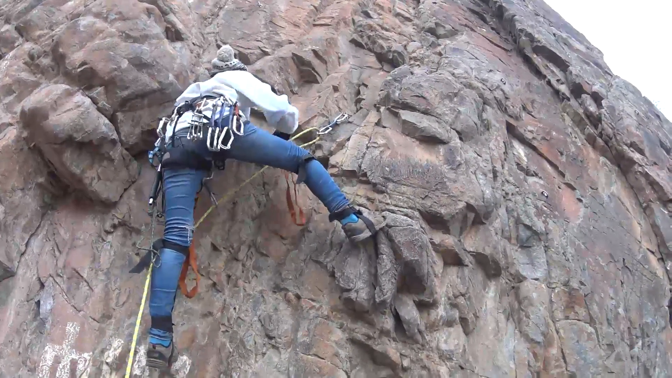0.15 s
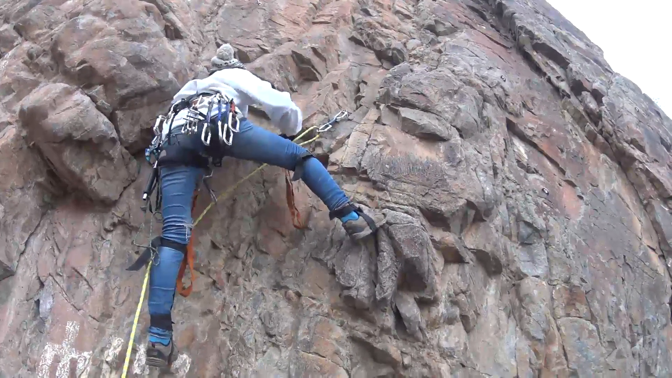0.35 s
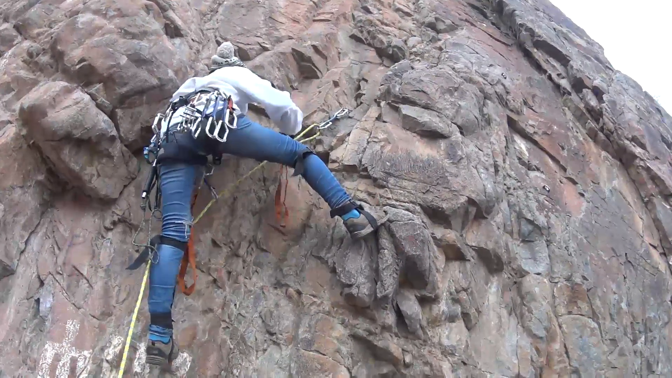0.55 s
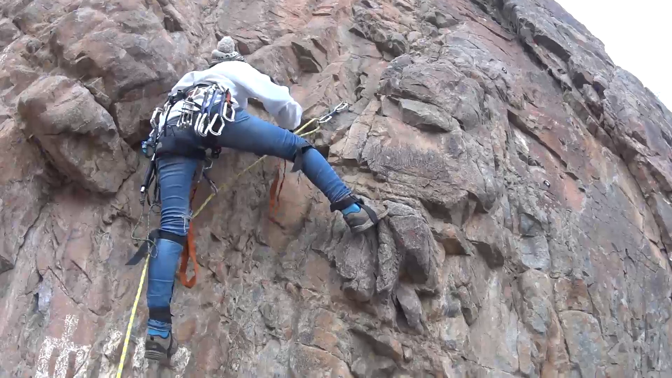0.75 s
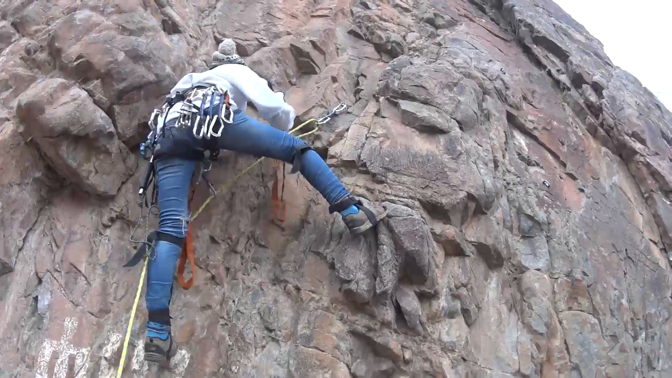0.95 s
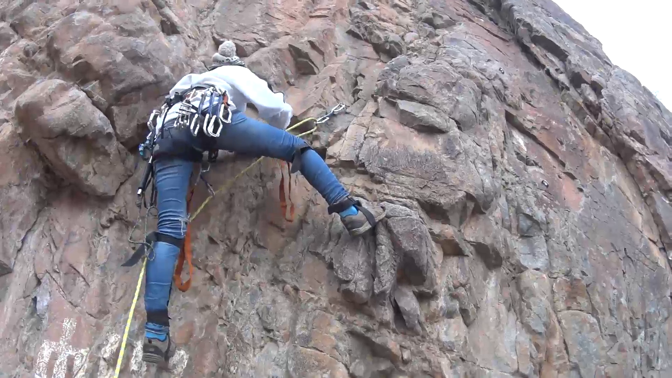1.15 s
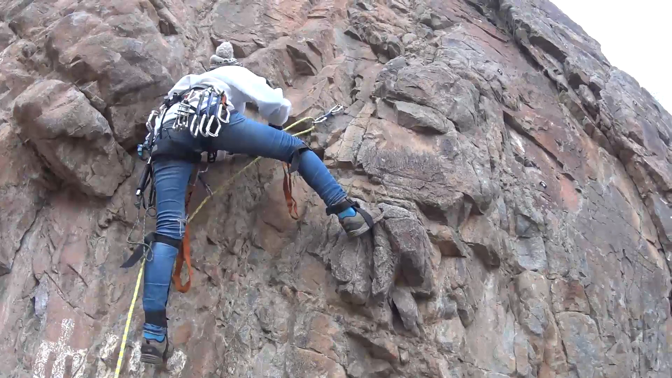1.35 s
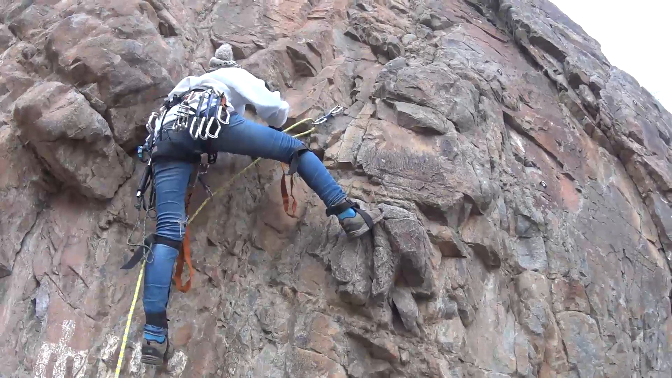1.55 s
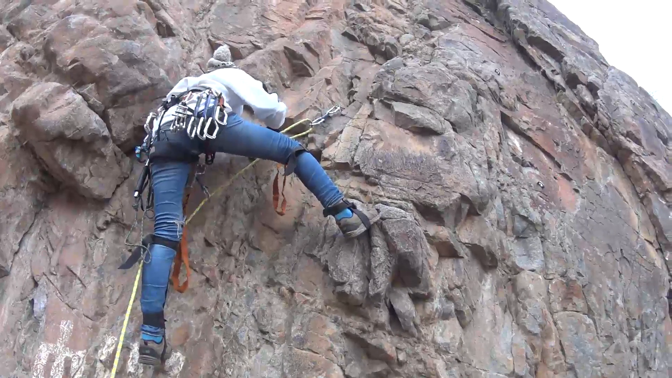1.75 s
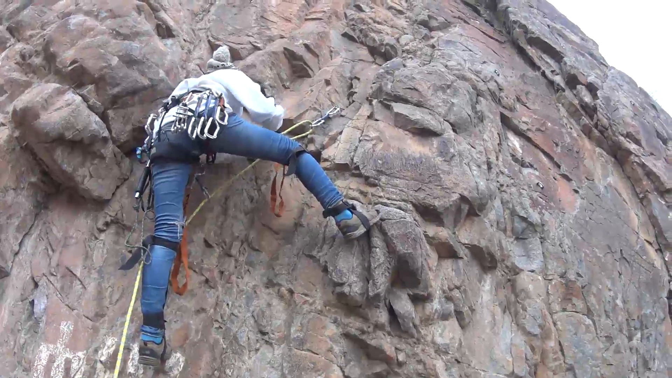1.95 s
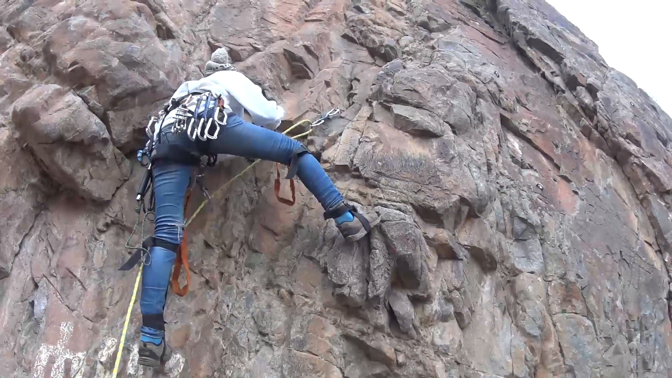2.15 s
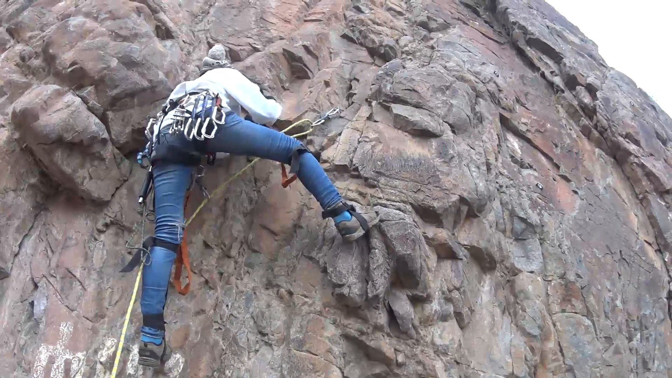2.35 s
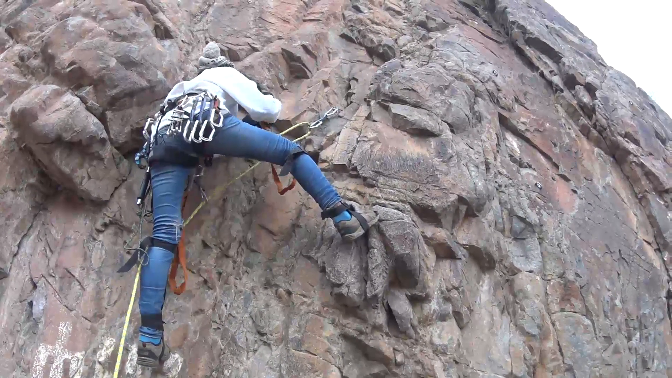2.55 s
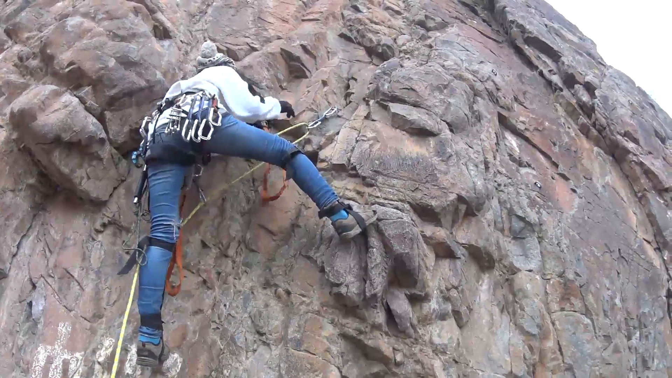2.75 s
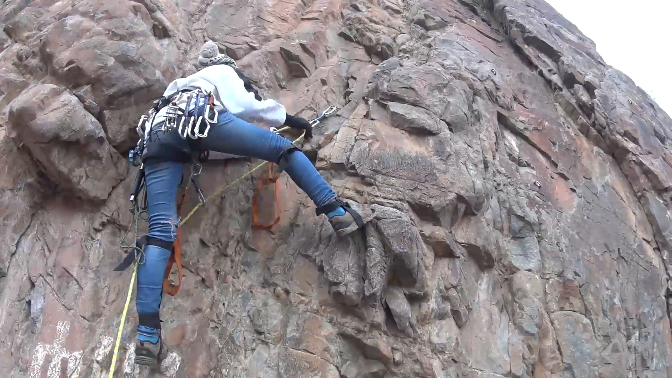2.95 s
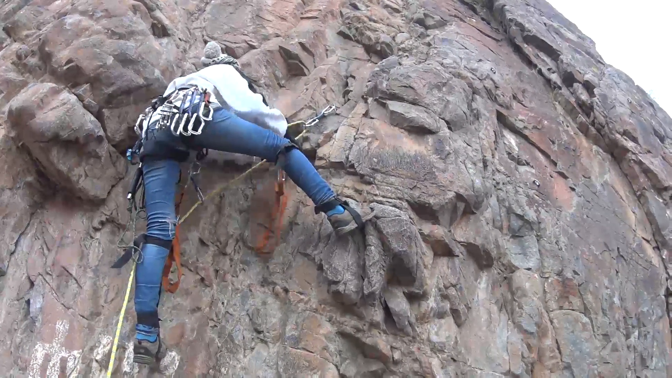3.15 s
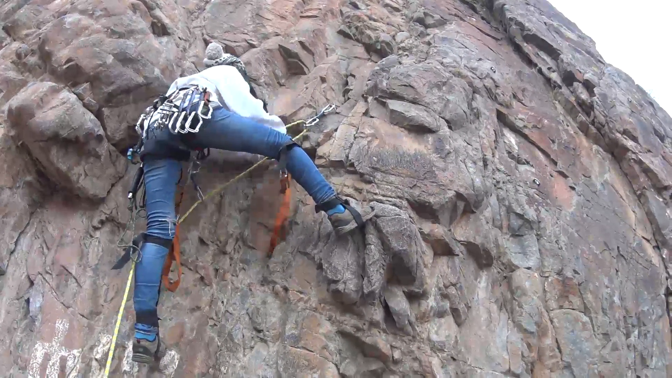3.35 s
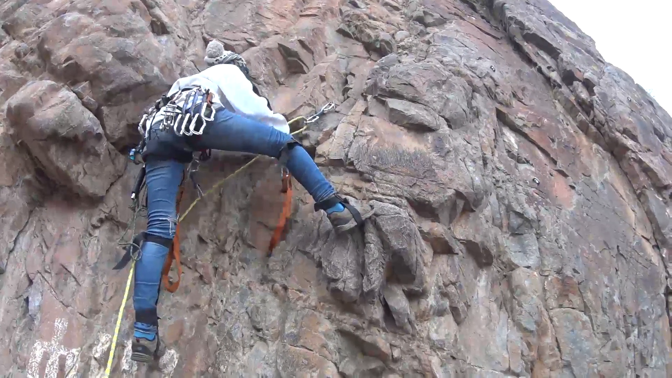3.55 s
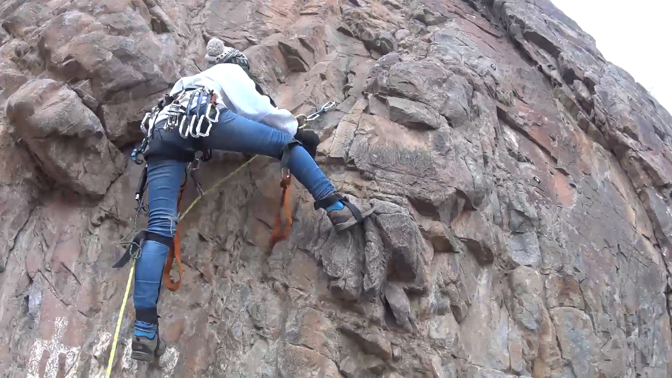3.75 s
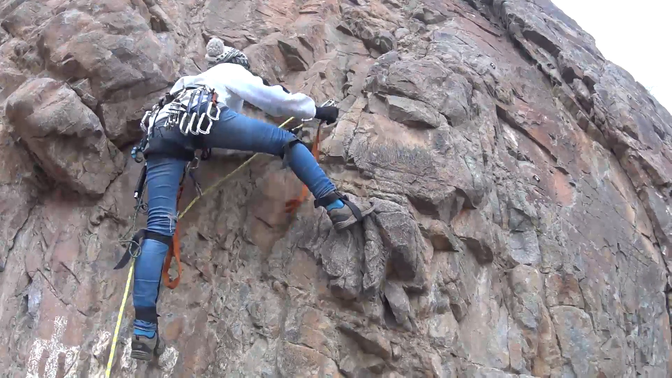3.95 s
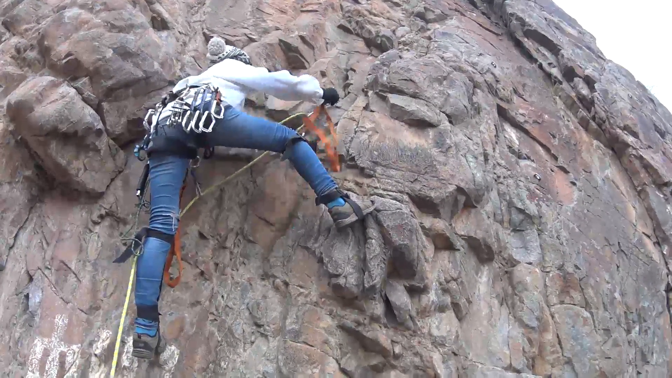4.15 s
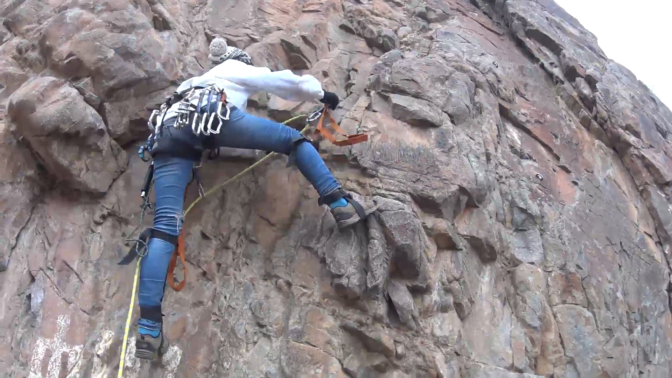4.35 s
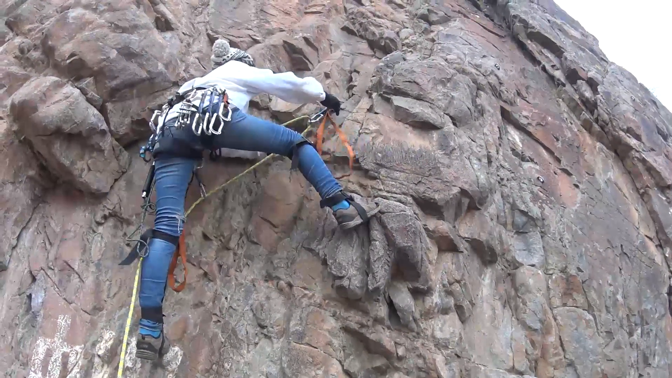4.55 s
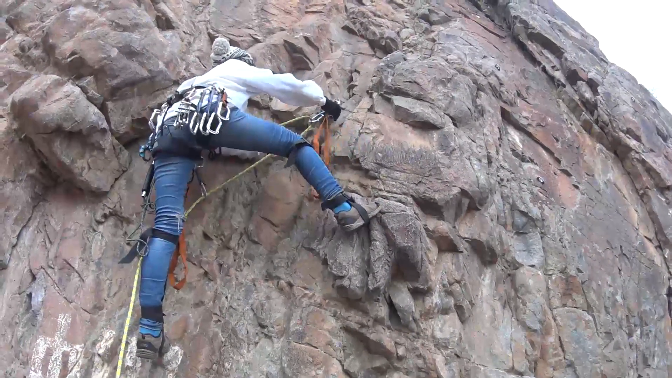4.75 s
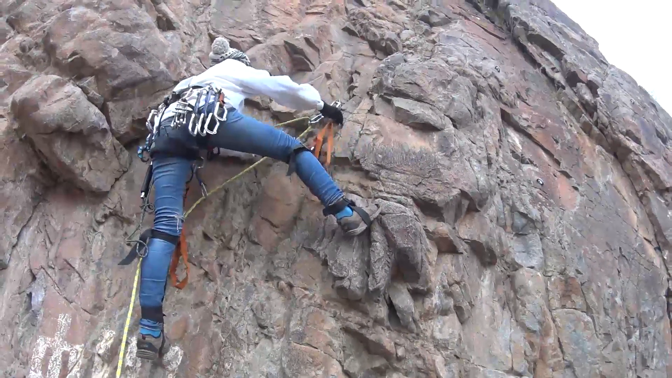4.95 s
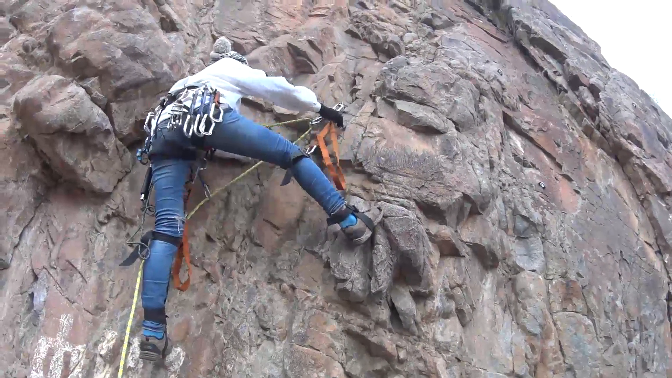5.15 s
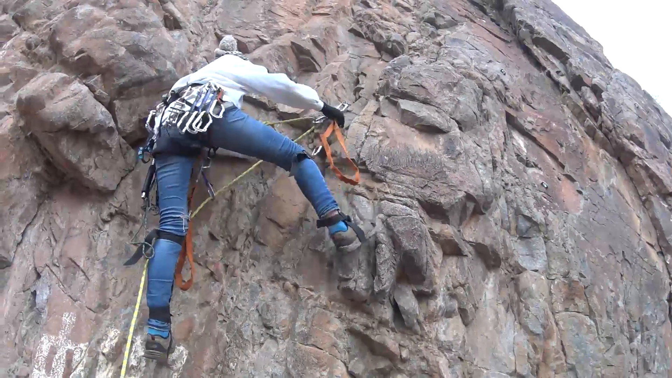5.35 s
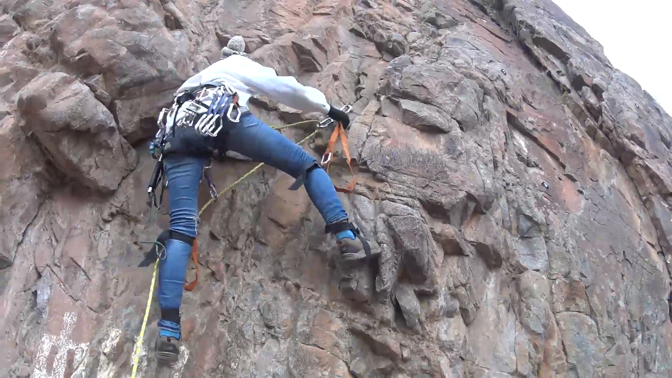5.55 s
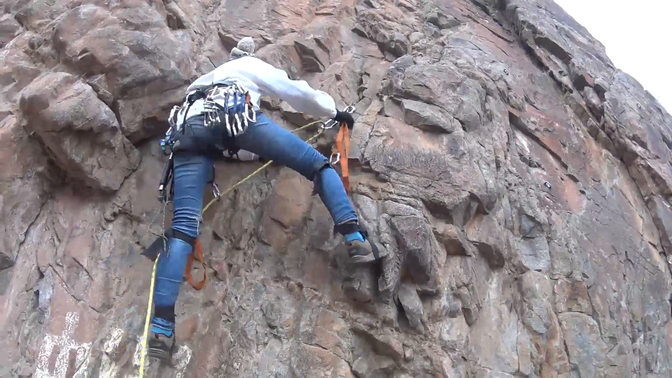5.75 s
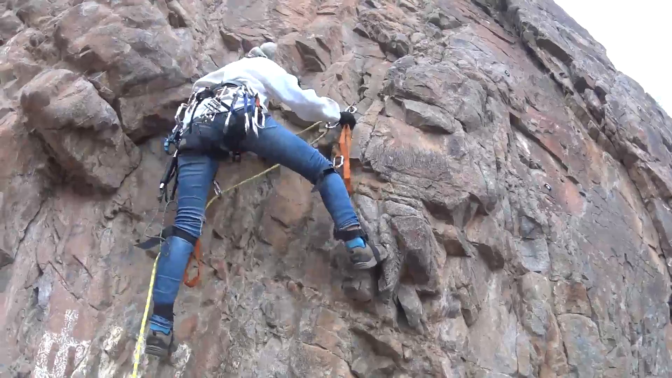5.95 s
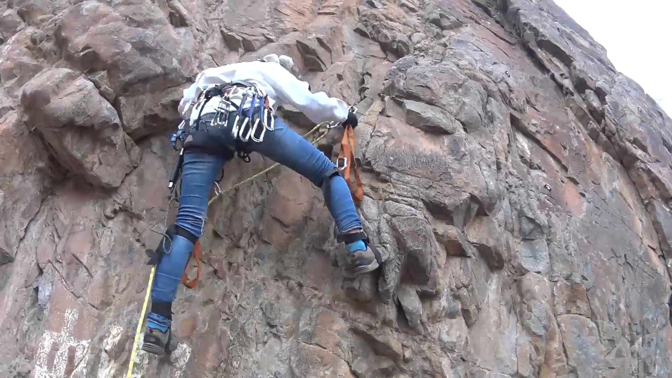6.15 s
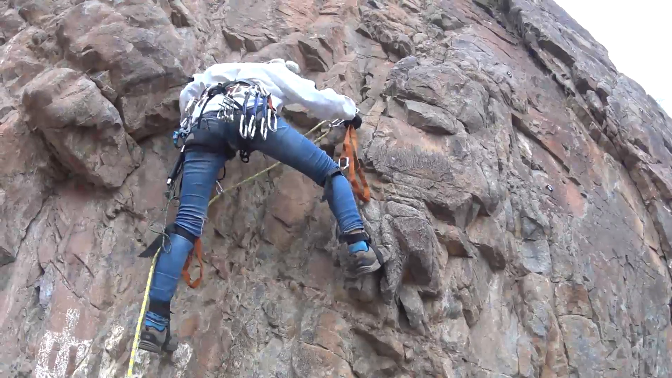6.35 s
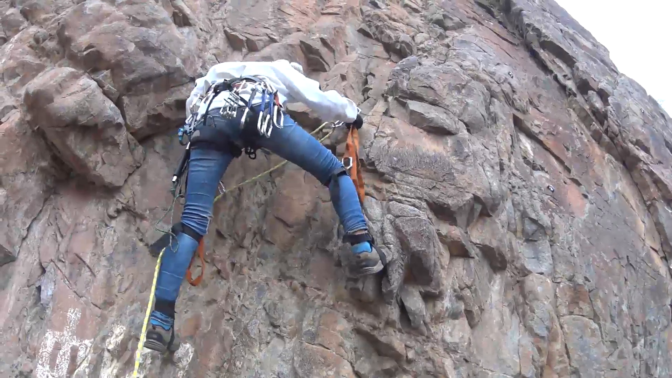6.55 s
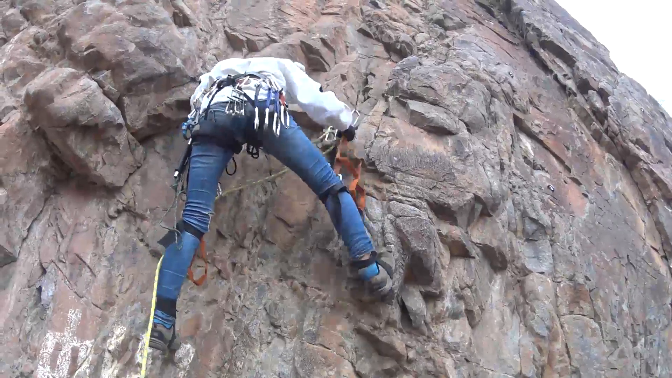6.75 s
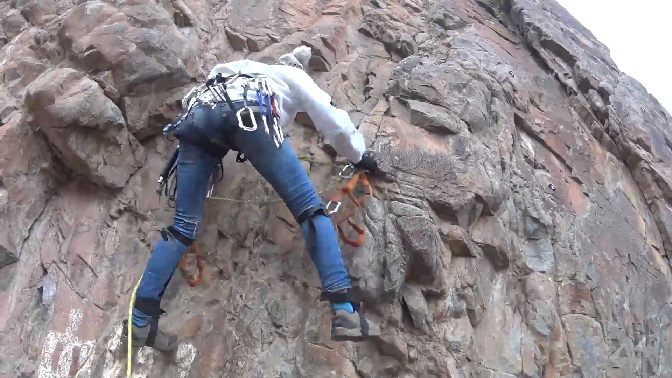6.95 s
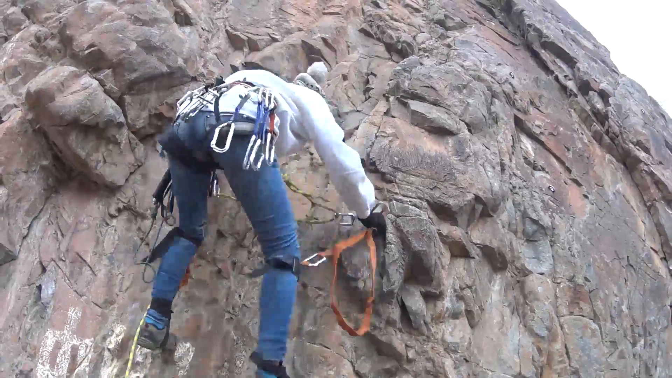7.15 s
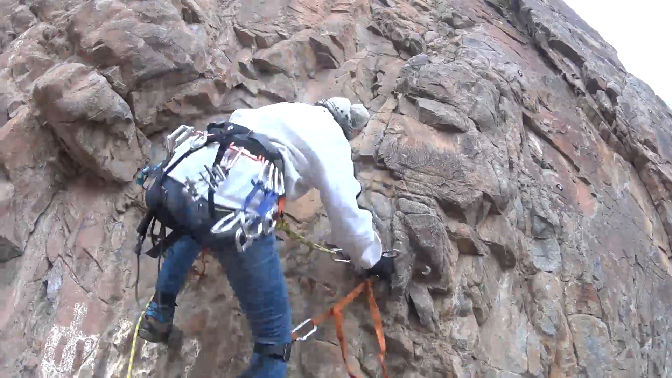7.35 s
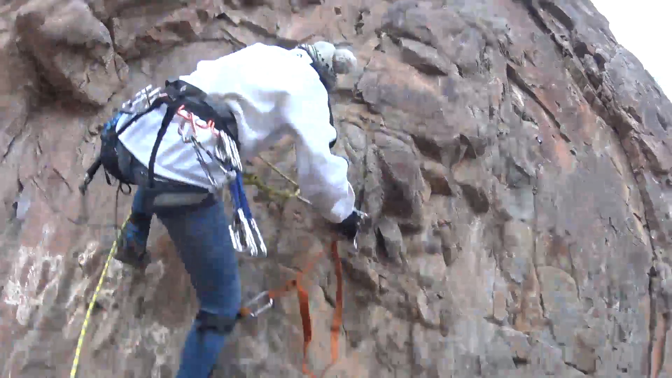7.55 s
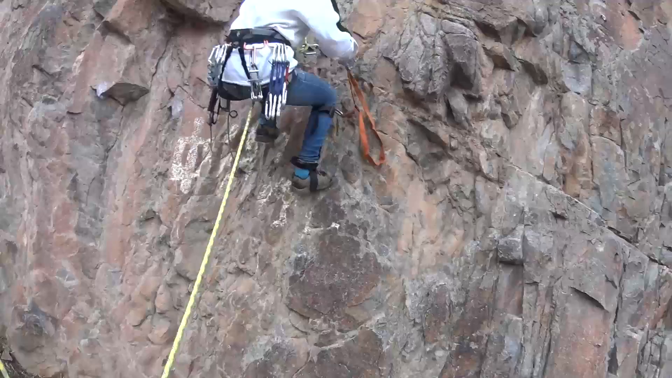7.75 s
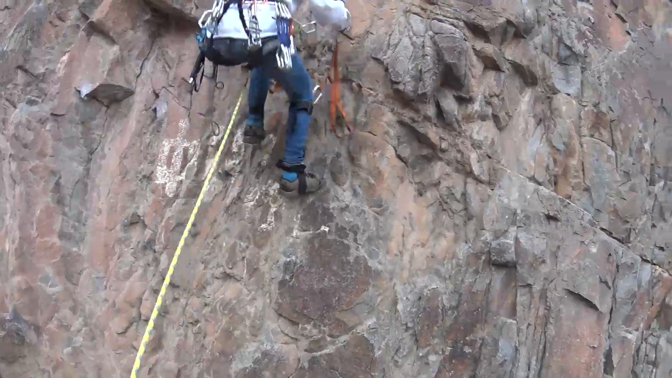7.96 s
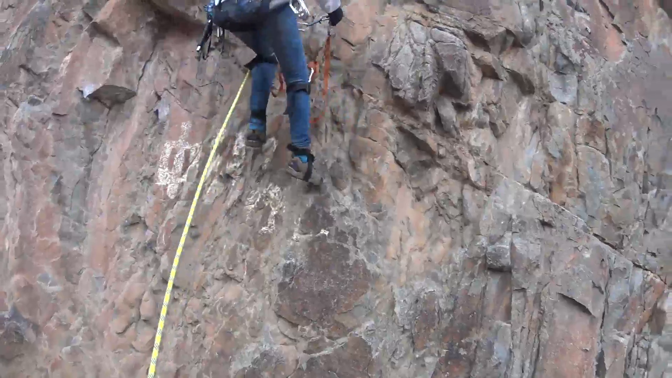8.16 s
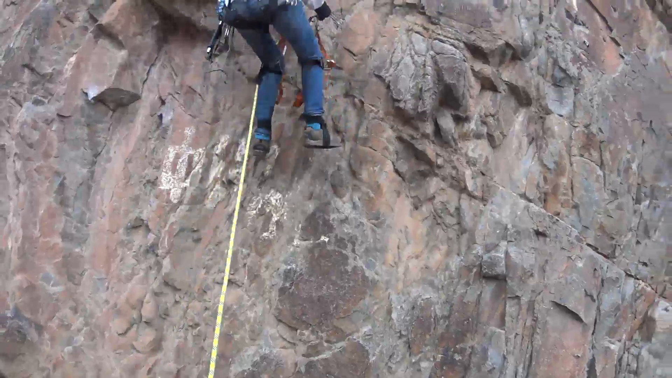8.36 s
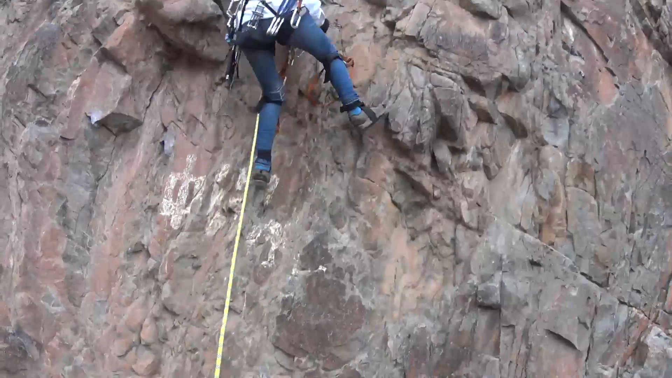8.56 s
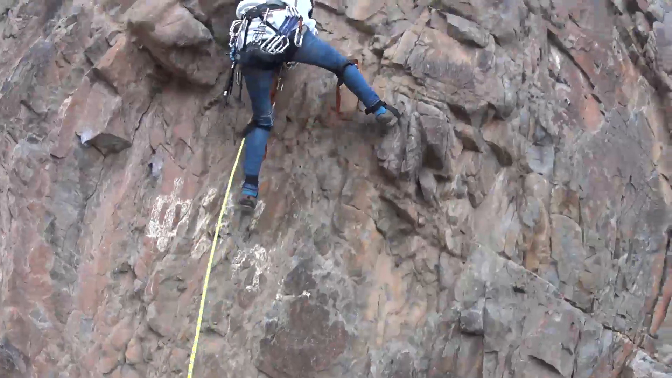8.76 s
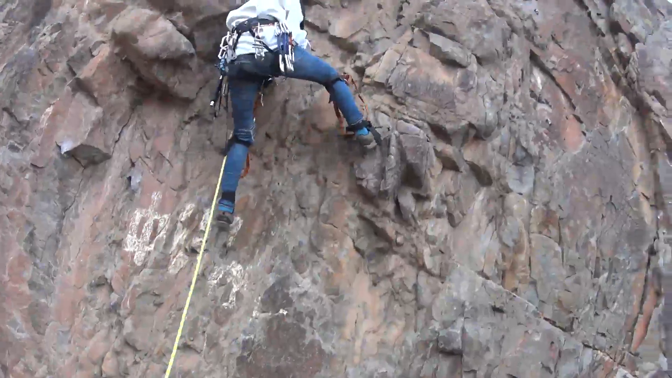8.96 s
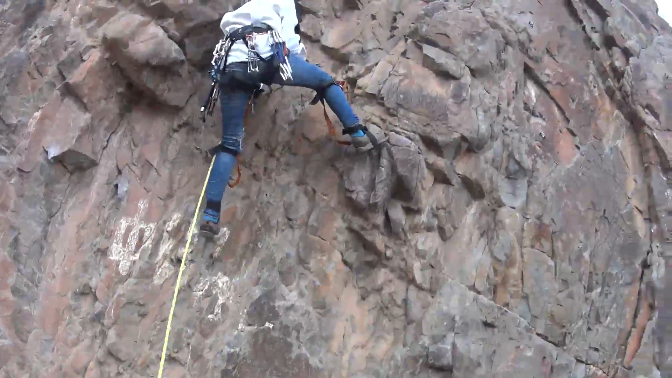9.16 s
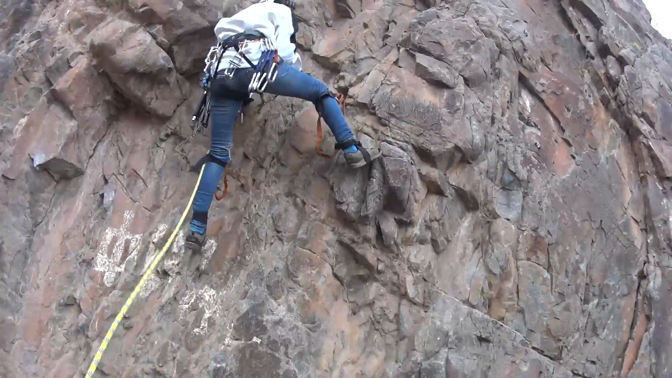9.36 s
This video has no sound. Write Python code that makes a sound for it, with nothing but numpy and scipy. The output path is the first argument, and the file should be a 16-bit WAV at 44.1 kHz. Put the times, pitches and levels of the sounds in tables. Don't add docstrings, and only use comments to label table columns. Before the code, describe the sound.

Outdoors at a rock face, a small camera a few metres away picks up a steady far wash of wind and water. Harness clips clink sparsely, pause, then clack in a small flurry. A slip throws the rack into loud, bright clattering and short rings as the rope catches. Looser jangling follows on the climb back up, with hand taps and a dull thump on the camera.

```python
import sys
import numpy as np
from scipy import signal
from scipy.fft import rfft, irfft, next_fast_len
from scipy.io import wavfile
from scipy.ndimage import uniform_filter1d

SR = 44100
rng = np.random.default_rng(int(sys.argv[2]) if len(sys.argv) > 2 else 0)


def volts_from_decibels(level):
    exponent = np.asarray(level, float) / 20
    return 10 ** exponent


def persist_wave(psi):
    counts = np.round(np.clip(psi, -1, 1) * 32767).astype(np.int16)
    wavfile.write(sys.argv[1], SR, np.atleast_2d(counts).T)


N = 414099
SCENE_CHANGE_S = 7.834


def evened(x):
    return x / np.sqrt(np.mean(x ** 2) + 1e-20)


def read(hz, value, at_hz):
    return np.interp(np.log(at_hz + 1), np.log(np.add(hz, 1)), value)


def add(mix, s, sound):
    part = mix[:, round(s * SR):][:, :sound.shape[1]]
    part += sound[:, :part.shape[1]]


def highpass(x, order, hz):
    return signal.sosfilt(signal.butter(order, hz, "high", fs=SR, output="sos"), x)


def bandpass(x, order, low_hz, high_hz):
    return signal.sosfilt(signal.butter(order, [low_hz, high_hz], "band", fs=SR, output="sos"), x)


def panned(pan_db):
    return volts_from_decibels([[pan_db / 2], [-pan_db / 2]])


# [f/Hz, level/dB per Hz]
WASH_SPECTRUM = [(30, -16), (80, -45), (125, -14.5), (250, -11.5), (750, -14.5), (1300, -7.5), (1700, 2.5),
                 (2100, 1.5), (2600, -10), (3900, -15), (4400, -12.5), (5100, -20), (6300, -28.5),
                 (7000, -29.5), (9000, -35)]
# [t/s, level change/dB]
CAMERA_TURN = [
    (8.7, -4.5),
    (8.9, -1.5),
    (9.05, -8.5),
    (9.15, -14),
    (9.39, -6.5),
]


def wash(level_db=-33.5, patchy_db=0.7, housing_hz=1600, width_hz=350):
    frames, hz = N // 256 + 5, np.fft.rfftfreq(1024, 1 / SR)
    a, b, c, d, patches = rng.standard_normal((frames, 513, 5)).T
    patches = uniform_filter1d(patches, size=12, axis=0)
    patches = evened(uniform_filter1d(patches, size=14, axis=1))
    resonance = np.exp(-((hz - housing_hz) / width_hz) ** 2)
    turn_db = np.interp(np.arange(frames) * 256 / SR, *np.transpose(CAMERA_TURN))
    db = read(*np.transpose(WASH_SPECTRUM), hz)[:, None] + patchy_db * patches
    db = db + np.outer(resonance, turn_db)
    spectra = np.array([a + 1j * b, c + 1j * d]) * volts_from_decibels(db)
    noise = signal.istft(spectra, nperseg=1024, noverlap=768)[1][:, :N]
    return volts_from_decibels(level_db) * evened(noise)


# [t/s, peak level/dB]
SNAP_TICKS = [(0.0992, -28), (0.7751, -26), (4.6369, -35), (4.7017, -35), (5.693, -24), (5.7166, -20),
              (5.8077, -16), (6.2502, -21), (6.8418, -19), (6.8633, -18), (6.9212, -24), (6.9466, -20),
              (7.0315, -8), (7.0489, -16), (7.133, -8), (7.1404, -25), (7.2873, -16), (7.296, -13),
              (7.3412, -23), (7.3871, -32), (7.5487, -11), (7.7414, -27), (7.7682, -27), (7.7817, -14),
              (8.9654, -26), (8.973, -19), (8.9844, -28)]


def snaps():
    steps = np.zeros(N)
    s, db = np.transpose(SNAP_TICKS)
    steps[np.round((s + .0009) * SR).astype(int)] = volts_from_decibels(db + 6)
    tick = highpass(steps, 2, 2500)
    return np.array([tick, np.roll(tick, 9)])


# [f/Hz, level/dB]
RACK_MODES = [(900, -86), (1650, 6), (2150, 10.5), (2900, 1), (3700, 7.5), (4500, 8.5), (5600, 6),
              (6300, -3), (7000, 8.5), (8300, -1), (9350, -2.5), (9900, 3.5), (10700, 7), (12500, 6)]
REST, MUTE = 0.11, 0.22
FRAME_HZ, DAMPING = 3680, 0.17


def clack(body_db, edge_db, t60, main_hz, count=48, scatter_db=6.0, near_db=7.0, near_hz=600):
    place, size, life, turn = rng.random((4, 2, count, 1))
    hz = 1000 + 12000 * (np.arange(count)[:, None] + place) / count
    t = np.arange(round(t60 * SR) + 300) / SR
    db = read(*np.transpose(RACK_MODES), hz) + scatter_db * (2 * size - 1)
    db = db + near_db * np.exp(-((hz - main_hz) / near_hz) ** 2)
    contact = np.minimum(t / 0.00029, 1) * (1 + 0.8 * np.exp(-t / 0.0016))
    strike = contact * (REST + np.exp(-(t / (MUTE * t60)) ** 2))
    mode_t60 = t60 * (.4 + .7 * life) * (4500 / hz) ** DAMPING
    modes = strike * volts_from_decibels(db - 60 * t / mode_t60) * np.sin(2 * np.pi * (hz * t + .45 * turn))
    main = volts_from_decibels(20.5 - 60 * t / (0.3 * t60)) * np.sin(2 * np.pi * main_hz * t)
    main += volts_from_decibels(7.5 - 60 * t / (0.98 * t60)) * np.sin(2 * np.pi * FRAME_HZ * t)
    bands = np.split(modes, [count // 6, count * 3 // 7], axis=1)
    body, blow, edge = (band.sum(1) for band in bands)
    layers = zip((body, blow + main, edge), (body_db, 0, edge_db))
    return sum(volts_from_decibels(d) * x / np.sqrt(np.mean(x[:, :220] ** 2)) for x, d in layers)


# [t/s, blow level/dB, body level/dB re blow, edge level/dB re blow, strongest mode f/Hz]
SHIFT_BLOWS = [(0.1, -37.5, -10, -4, 3740), (0.14, -45, -8, -18, 4800), (0.606, -42.5, -7, -5, 4690),
               (0.776, -35, -22, 1, 5730), (4.328, -41, -1, -11, 4310), (4.5286, -41, -4, -18, 4220),
               (4.6373, -30, -14, -11, 4740), (4.7025, -42, -5, -3, 3650), (5.5571, -28, 0, -7.5, 4600),
               (5.6504, -40, -3, -5, 4220), (5.694, -31.5, -14, -11, 4900), (5.7065, -35, -9, -7, 4690),
               (5.7184, -23, -15, -6, 3820), (5.736, -36, -9, -3, 3800), (5.7473, -38, -15, -2, 3770),
               (5.8086, -24.5, -20, 1, 4830), (6.0763, -31, -17, -8, 5640), (6.114, -35.5, -9, -0.5, 4730),
               (6.1616, -44, -3, -9, 5430), (6.251, -25.5, -10, -2, 5600)]
SLIP_BLOWS = [(6.711, -24, 1.5, -7, 4400), (6.723, -28, -3, -4, 4350), (6.8426, -21, -13, -7, 4760),
              (6.8636, -23.5, -7, -1, 4770), (6.883, -28.5, -8, -5, 3370), (6.921, -29, -10, -6, 3570),
              (6.9461, -15.5, -9, -9, 4240), (6.9537, -20, -4, -6, 4450), (6.974, -17, -27, -10, 4230),
              (7.032, -16.5, -1.5, -5, 4450), (7.05, -18.5, -32, -4, 4200), (7.1125, -28, 1, -18, 3620),
              (7.1326, -25, -23, -1, 4550), (7.1409, -22, -16, -15, 3670), (7.192, -28, -8, 2, 4870),
              (7.2137, -25.5, 4, 3, 5330), (7.219, -23.5, -5, 0, 4500)]
CATCH_BLOWS = [(7.28, -36, 2, -2, 4910), (7.2878, -25.5, -1, -5, 3530), (7.2958, -23, 1.5, 2.5, 4000),
               (7.3051, -21.5, 3.5, 0, 4400), (7.326, -28.5, 5, -3, 3430), (7.3424, -27, -2, -4, 3560),
               (7.3876, -29, -11, -10, 4890), (7.422, -38, -10, 8, 4670), (7.432, -17.5, -16, -12, 4930),
               (7.4479, -22.5, -24, -1, 5530), (7.47, -35, -11, 3, 4720), (7.5188, -29, -6, -14, 5200),
               (7.527, -26.5, -3, 0, 3660), (7.548, -29, -3, 7, 3630), (7.58, -29.5, 2, -12, 8280),
               (7.616, -36, -11, 1, 3740), (7.6805, -29, 3, -8, 4390), (7.7402, -38, 5, -9, 3700),
               (7.7687, -24, -10, -9, 4970), (7.7827, -23, -4, -3, 4900), (7.823, -39, -11, -5, 5100)]
CLIMB_BLOWS = [(8.017, -37.5, 4, -9, 3140), (8.28, -31.5, -13, -14, 4400), (8.3331, -37, -3, -4, 3670),
               (8.4256, -27.5, 0, -16, 3860), (8.484, -37, -10, -2, 5250), (8.5149, -31, -12, -8, 3550),
               (8.5354, -31, -21, 1, 5000), (8.569, -26, -14, 1, 5430), (8.6857, -26.5, -16, -6, 3630),
               (8.9658, -33, -12, 1, 5940), (8.975, -24.5, -21, 0.5, 5060), (9.027, -37.5, -10, 0.5, 3750),
               (9.1436, -33.5, -8, 0, 5700), (9.2984, -48, 0, -3, 4740), (9.33, -37.5, -9, -5, 3230)]
FURTHER_BLOWS = [(0.464, -47, -10, -5, 5700), (0.787, -50, -10, -3, 5700), (6.743, -41, -5, -5, 4500),
                 (7.486, -34, 0, -2, 5770), (7.559, -27, -6, -5, 5330), (7.565, -29, -12, -8, 5260),
                 (7.609, -33, -6, -8, 4290), (7.622, -29.5, 6, -5, 4400), (8.288, -39, -10, -13, 4500),
                 (8.436, -35, -8, -7, 4200), (8.491, -38, -10, -3, 5030), (8.541, -33, -15, -2, 4850),
                 (8.6, -33, -10, 2, 5100), (8.635, -37, -12, 2, 4930), (8.986, -35, -15, 2, 4970),
                 (9.125, -41, -8, -11, 5400), (9.149, -38, -10, -3, 5850), (5.727, -36, -10, -5, 3740),
                 (5.817, -43, -10, 3, 4300), (6.255, -50, -10, 7, 5200), (8.519, -38, -7, -1, 4500),
                 (9.2, -44, -10.5, -2, 5000), (6.835, -34, 2, -14, 3800), (7.437, -24, -11, -1, 5000),
                 (7.443, -25, -11, -1, 5600), (7.554, -26, -2, -6, 3740), (6.266, -48, -10, 6, 5160)]
BARE_ROCK_S = (5.5566, 5.6945, 5.707, 6.8425, 7.1408, 7.3876, 7.5192, 7.5274, 7.7683, 7.823, 8.4253, 8.436,
               8.6853, 8.9658, 8.975, 9.1437)


def clacks():
    out = np.zeros((2, N))
    for s, db, body_db, edge_db, hz in SHIFT_BLOWS + SLIP_BLOWS + CATCH_BLOWS + CLIMB_BLOWS + FURTHER_BLOWS:
        t60 = np.interp(db, [-45, -26], [0.14, 0.062])
        if np.isclose(s, BARE_ROCK_S, atol=.0025).any():
            t60 = 0.018
        add(out, s, volts_from_decibels(db) * clack(body_db, edge_db, t60, hz))
    return out


# [t/s, level/dB, f/Hz, t60/s]
FREE_RINGS = [(0.182, -55, 9250, .04), (0.466, -47, 5700, .07), (0.608, -49, 9330, .07),
              (0.612, -50, 5500, .05), (0.777, -34, 3650, .05), (4.6395, -32, 3690, .07),
              (4.704, -36, 3700, .04), (5.5565, -19, 4600, .018), (5.558, -36, 3620, .04),
              (5.572, -42, 5790, .045), (5.719, -44, 9300, .06), (5.719, -35, 5900, .03),
              (5.722, -32, 3700, .16), (5.81, -36, 3630, .14), (5.81, -36, 10500, .06),
              (5.905, -41, 4400, .09), (6.077, -38, 5700, .06), (6.114, -39, 9400, .05),
              (6.145, -44, 4300, .05), (6.162, -51, 8200, .04), (6.252, -36, 3670, .05),
              (6.253, -37, 10700, .05), (6.253, -38, 6830, .04), (6.711, -12, 1650, .03),
              (6.71, -19, 1300, .025), (6.925, -34, 3620, .09), (6.947, -21, 4060, .045),
              (7.033, -25, 6900, .045), (7.009, -43, 9400, .02), (6.975, -24, 4100, .03),
              (7.105, -34, 3700, .04), (7.109, -37, 4520, .054), (7.147, -37, 9330, .26),
              (7.15, -44, 7080, .045), (7.13, -43, 10150, .05), (7.156, -39, 8170, .132),
              (7.159, -38, 5430, .052), (7.165, -39, 5730, .045)]
# [t/s, level/dB, f/Hz, t60/s]
ROPE_RINGS = [(7.388, -30, 4890, .025), (7.298, -26, 4050, .04), (7.431, -29, 3600, .045),
              (7.432, -25, 4850, .04), (7.445, -28, 5500, .06), (7.52, -35, 5700, .12),
              (7.783, -26, 4950, .04), (7.455, -32, 3620, .097), (7.458, -34, 4310, .081),
              (7.488, -31, 5770, .045), (7.553, -31.5, 3720, .2), (7.554, -33, 510, .06),
              (7.556, -33, 355, .06), (7.751, -44, 7950, .05), (7.571, -45, 7080, .088),
              (7.578, -26, 2300, .03), (7.632, -40, 3450, .16), (7.638, -37, 4260, .088),
              (7.696, -42, 3820, .081), (7.745, -35, 3680, .09), (7.437, -33, 6850, .04)]
# [t/s, level/dB, f/Hz, t60/s]
ASCENT_RINGS = [(8.338, -40, 3720, .11), (8.594, -40, 3620, .15), (8.536, -42, 7600, .08),
                (8.516, -43, 10500, .05), (8.537, -31, 4820, .06), (8.62, -42, 10642, .2),
                (8.578, -44, 8170, .15), (8.633, -42, 9300, .052), (8.758, -42, 3650, .12),
                (8.976, -29, 5000, .07), (8.98, -37, 3710, .14), (9.028, -43, 10720, .07),
                (9.144, -38, 5810, .07), (9.125, -49, 8200, .2), (9.298, -46, 9350, .08),
                (9.33, -44, 5800, .05)]
# [t/s, level/dB, f/Hz, length/s]
CAUGHT_RINGS = [(6.1, -49, 9300, .05), (7.062, -29, 4405, .038), (7.18, -32, 7070, .02),
                (7.421, -32, 9330, .035), (7.468, -28, 9340, .026), (7.533, -39, 8170, .025),
                (7.575, -37, 8170, .016), (7.612, -41, 8170, .068), (7.638, -36.5, 5450, .085),
                (7.64, -44, 9350, .052), (7.684, -37, 10146, .058), (7.695, -42, 8170, .03),
                (7.808, -45, 9300, .024), (8.537, -34, 3610, .025), (8.537, -34, 9300, .016),
                (8.545, -41, 7084, .05), (8.557, -40, 9300, .035), (8.57, -34, 3620, .022),
                (8.568, -31, 5450, .016), (9.295, -50, 7100, .012), (7.464, -36, 7150, .012),
                (7.55, -33, 3720, .025), (7.122, -43, 7080, .012), (8.571, -21, 10642, .018),
                (8.59, -28, 10642, .028), (8.592, -36, 1700, .006), (7.742, -36, 3680, .012)]
# [f/Hz, left-right level/dB]
HOUSING_SHADE = [(3000, 1), (5800, 3), (7100, 4), (8150, 7), (9350, 11.5), (10600, 5)]
GATE_HZ = (7080, 10150)
QUICK_S, SLOW_S = 0.0016, 0.036
CAUGHT_T60_S, CATCH_S = .4, .005
CROWD_HZ, CROWD = 9500, 0.7


def rings(split_hz=40.6, twin=0.3, flutter_db=1.6):
    out, flutter = np.zeros((2, N)), rng.standard_normal(1500)
    rows = [(*row, np.inf) for row in FREE_RINGS + ROPE_RINGS + ASCENT_RINGS]
    rows += [(s, db, hz, CAUGHT_T60_S, length) for s, db, hz, length in CAUGHT_RINGS]
    for (s, db, hz, t60, length), (u, v, w) in zip(rows, rng.random((len(rows), 3))):
        swell = QUICK_S if length > t60 else CATCH_S
        if np.isclose(hz, GATE_HZ, rtol=.02).any() and length > t60:
            swell = SLOW_S
        t = np.arange(round(min(swell + t60, length + CATCH_S) * SR)) / SR
        shape = np.minimum(t / swell, 1) * volts_from_decibels(db + 3 - 60 * np.maximum(t - swell, 0) / t60)
        shape *= np.clip(1 - (t - length) / CATCH_S, 0, 1)
        shape *= (s > SCENE_CHANGE_S) | (s + t < SCENE_CHANGE_S)
        shape *= volts_from_decibels(flutter_db * np.interp(t + s, np.arange(len(flutter)) / 150, flutter))
        turn = 2 * np.pi * (hz * t + np.array([[0], [.7 * (u - .5)]]))
        pair = np.sin(turn) + twin * np.sin(turn + 2 * np.pi * (split_hz * (.5 + v) * t + w))
        if abs(hz - CROWD_HZ) < 150:
            below = np.sin(turn - 2 * np.pi * (95 * t + v))
            above = np.sin(turn + 2 * np.pi * (70 * t + u))
            pair += CROWD * (below + above)
            pair /= np.sqrt(1 + 2 * CROWD ** 2)
        add(out, s, shape * pair * panned(read(*np.transpose(HOUSING_SHADE), hz)))
    return out


# [t/s, level/dB]
SHAKES = [
    [(5.63, -52), (5.77, -48), (5.9, -54), (6.05, -58), (6.12, -52), (6.3, -66)],
    [(6.7, -45), (6.79, -52), (6.84, -36), (6.9, -46), (6.96, -36.5), (7.02, -42), (7.06, -36), (7.12, -45),
     (7.16, -33.5), (7.22, -36), (7.27, -46)],
    [(7.27, -50), (7.31, -37), (7.38, -44.5), (7.44, -32.5), (7.5, -34), (7.56, -34), (7.63, -35),
     (7.66, -37), (7.69, -37.5), (7.75, -40.5), (7.83, -36)],
    [(7.84, -56), (8.03, -49), (8.2, -51), (8.34, -52), (8.4, -48), (8.47, -44), (8.5, -49), (8.58, -39),
     (8.64, -46), (8.67, -47), (8.72, -41)],
    [(8.72, -45.5), (8.85, -53.5), (8.95, -50), (9.0, -43.5), (9.08, -49), (9.14, -46.5), (9.2, -49),
     (9.28, -48.5), (9.33, -52), (9.39, -51)],
]
LOOSE_PIECES_HZ = [3650, 4070, 4350, 4770, 5350, 5790, 7080, 9350]
FIRM_DB = -40
EDGE_DB, EDGE_GROWS = -2.5, 0.53
BODY_DB, BODY_GROWS = 4, -0.33


def rattle(per_s=1600, spread_db=3.0, t60=0.047):
    t, out = np.arange(N) / SR, np.zeros((2, N))
    size = volts_from_decibels(spread_db * np.minimum(rng.exponential(1, N), 3.5)) * (rng.random(N) < per_s / SR)
    which = rng.integers(0, len(LOOSE_PIECES_HZ), N)
    touches = np.zeros((2, N))
    for k, hz in enumerate(LOOSE_PIECES_HZ):
        hits = (size * (which == k))[None]
        touches += signal.oaconvolve(hits, clack(0, 0, t60, hz), axes=1)[:, :N]
    body = evened(signal.sosfilt(signal.butter(6, 2900, fs=SR, output="sos"), touches))
    middle = evened(bandpass(touches, 4, 2900, 6200))
    edge = evened(highpass(touches, 6, 6200))
    for rows in SHAKES:
        db = np.interp(t, *np.transpose(rows), -120, -120)
        over_db = np.maximum(db - FIRM_DB, -20)
        bright = volts_from_decibels(EDGE_DB + EDGE_GROWS * over_db) * edge
        heavy = volts_from_decibels(BODY_DB + BODY_GROWS * over_db) * body
        out += volts_from_decibels(db) * (middle + bright + heavy)
    return out


# [t/s, level/dB]
GRIP_LEVEL = [
    (7.2, -74),
    (7.26, -66),
    (7.76, -54),
    (8.43, -61),
    (8.63, -38),
    (9.02, -56),
    (9.1, -46),
    (9.26, -64),
    (9.39, -60),
]


def grip():
    lumps = evened(bandpass(rng.standard_normal(N), 2, 18, 65))
    return lumps * volts_from_decibels(np.interp(np.arange(N) / SR, *np.transpose(GRIP_LEVEL), left=-120))


# [t/s, peak level/dB, push length/s, shell level/dB re push, left-right level/dB]
HAND_KNOCKS = [
    (7.407, -23, 0.0013, 9.5, 3.5),
    (8.516, -18.5, 0.00065, 10.5, 2.5),
    (8.627, -7, 0.00097, -33, -5),
    (8.633, -28, 0.0017, 5, 5),
    (8.643, -30, 0.0028, -20, -19),
    (8.681, -26, 0.0021, -20, -11),
    (8.7, -21, 0.0017, 4.5, 2),
    (8.709, -23.5, 0.0021, -20, -14),
    (9.093, -34, 0.008, -30, -6),
]
# [f/Hz, level/dB, t60/s]
SHELL_MODES = [(1210, -6, 0.015), (1560, 2.5, 0.0098)]


def knocks():
    out, t = np.zeros((2, N)), np.arange(1800) / SR
    for s, db, length, shell_db, pan_db in HAND_KNOCKS:
        u = t / length
        push = np.sin(np.pi * np.minimum(u, 1)) ** 2
        recoil = .5 * np.exp(-((u - 2.3) / 1.06) ** 2)
        shell = sum(volts_from_decibels(d - 60 * t / t60) * np.sin(2 * np.pi * hz * t) for hz, d, t60 in SHELL_MODES)
        shell *= -np.minimum(t / .0005, 1)
        add(out, s, volts_from_decibels(db) * (push - recoil + volts_from_decibels(shell_db) * shell) * panned(pan_db))
    return out


def rock(x, t60=0.06, wet_db=-12.0):
    t = np.arange(4000) / SR
    tail = rng.standard_normal((2, 4000)) * (rng.random((2, 4000)) < .15)
    tail *= volts_from_decibels(-60 * t / t60) * (t > .002)
    return x + volts_from_decibels(wet_db) * signal.oaconvolve(x, tail / np.linalg.norm(tail[0]), axes=1)[:, :N]


# [f/Hz, right re left level/dB, right lag/rad, likeness 0-1]
PORT_PAIR = [(60, 3.5, 0.25, 1), (296, 2, 0.46, 0.94), (660, 0.5, 0.7, 0.84), (1692, 1, 0.85, 1),
             (1993, -5.5, 2.74, 0.42), (2180, -7, 5.36, 0.34), (2780, -2, 6.94, 0.94),
             (4220, -2.5, 6.7, 0.5), (4600, 0.5, 6.53, 0.85), (5940, 0.5, 7.34, 0.4), (6300, -10, 7.5, 0.1),
             (6980, 4, 7.76, 0.4), (7260, -1, 7.82, 1), (11000, -0.5, 7.04, 0.7)]


def ports(pair, nearness):
    size = next_fast_len(N)
    hz = np.fft.rfftfreq(size, 1 / SR)
    f, db, lag, like = np.transpose(PORT_PAIR)
    a, b = rfft(pair, size)
    same = np.clip(read(f, like, hz), 0, 1) ** nearness
    blend = same * a + np.sqrt(1 - same ** 2) * b
    right = volts_from_decibels(read(f, db, hz)) * np.exp(-1j * read(f, lag, hz)) * blend
    return np.array([pair[0], irfft(right, size)[:N]])


def scene():
    gear = rock(clacks() + rattle() + snaps())
    gear = highpass(gear, 4, 1000)
    return ports(wash(), 0.73) + ports(gear, 0.28) + rings() + knocks() + grip()


def roll_off(x):
    return signal.sosfilt(signal.butter(12, 12370, fs=SR, output="sos"), x)


def record(dry):
    joined = dry * np.clip(abs(np.arange(N) / SR - SCENE_CHANGE_S) / 0.0046, .15, 1)
    edge = signal.firwin(401, 11060, window=("kaiser", 7), fs=SR)
    skirt = volts_from_decibels(-51) * np.pad(signal.firwin(41, 12400, window=("kaiser", 5), fs=SR), 180)
    skirt[200] += volts_from_decibels(-64)
    limited = signal.oaconvolve(joined, (edge + skirt)[None], "same")
    return roll_off(limited)


dry = scene()
out = record(dry)
persist_wave(out)
```